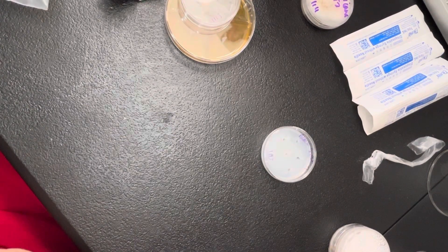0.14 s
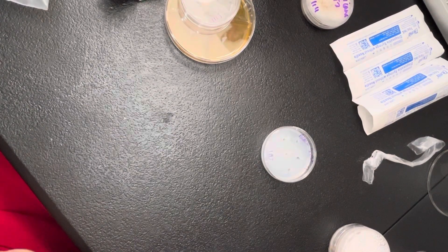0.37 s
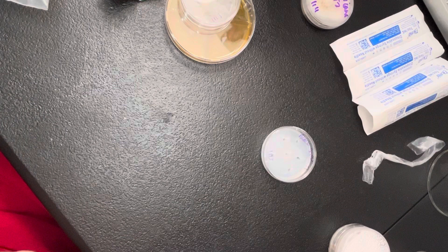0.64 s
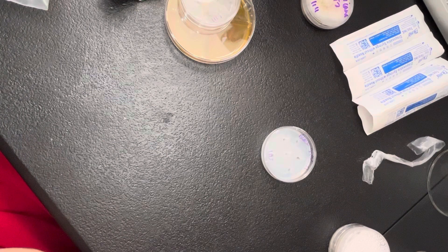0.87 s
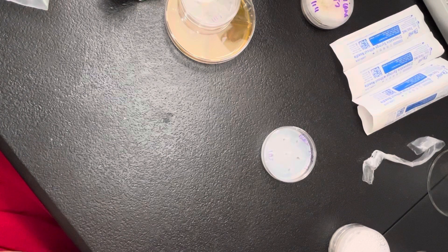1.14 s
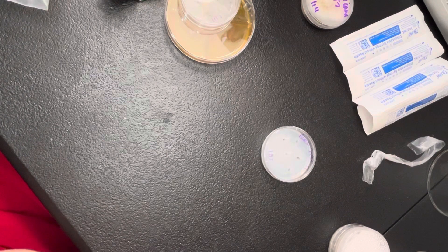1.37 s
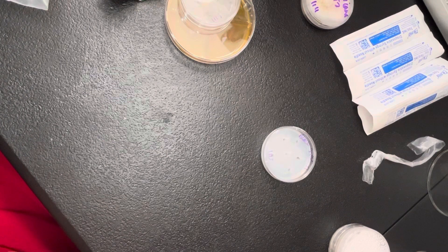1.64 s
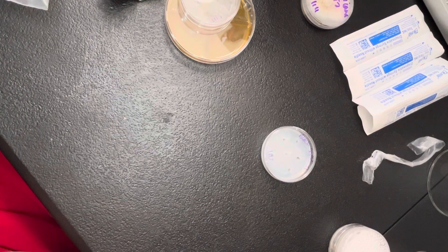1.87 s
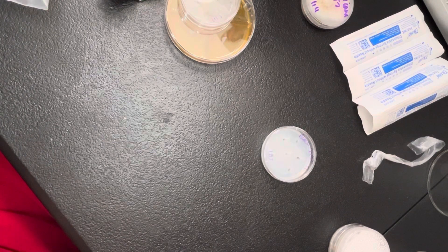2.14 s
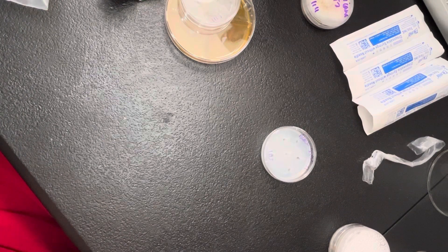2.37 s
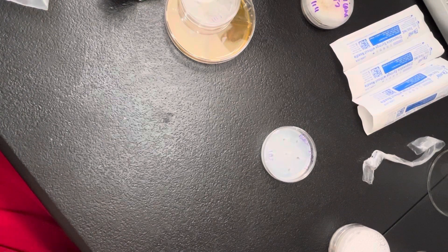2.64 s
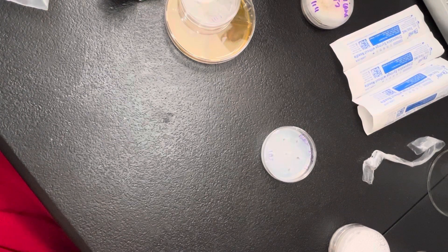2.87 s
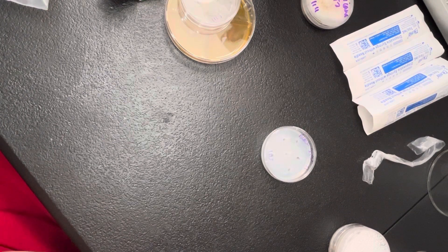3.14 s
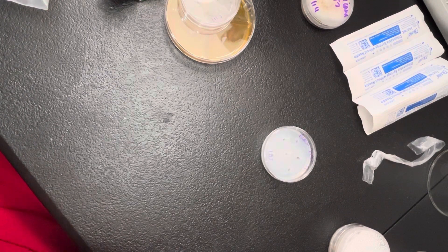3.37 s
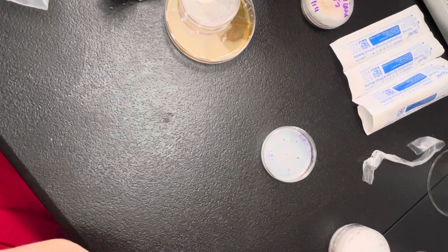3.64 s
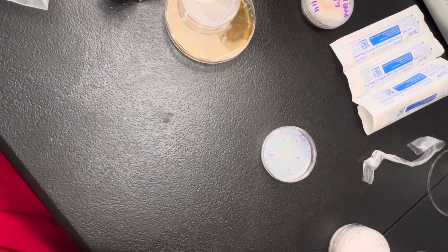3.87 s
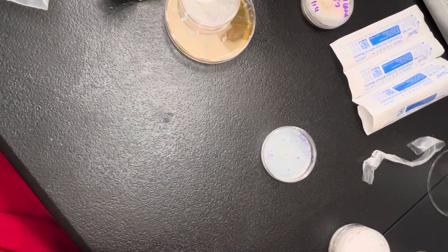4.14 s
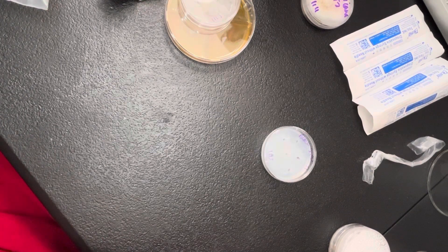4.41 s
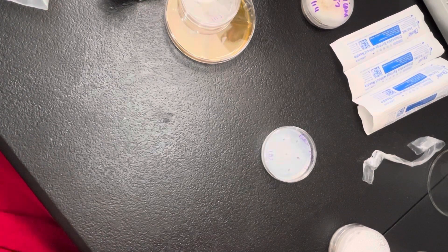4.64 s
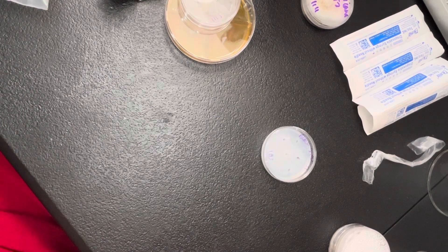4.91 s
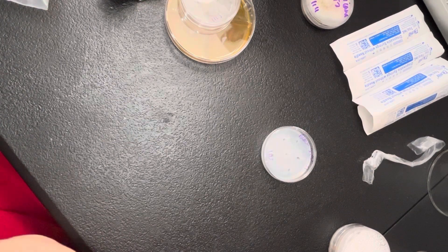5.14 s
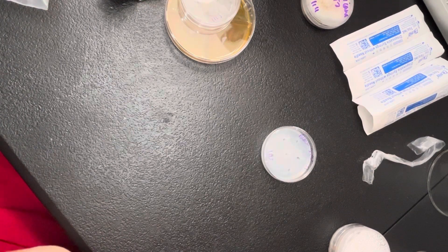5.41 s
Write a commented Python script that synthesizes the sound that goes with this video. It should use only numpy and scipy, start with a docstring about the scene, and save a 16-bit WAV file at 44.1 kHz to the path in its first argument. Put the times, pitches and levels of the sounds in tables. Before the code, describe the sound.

Thin plastic rims tick and snap, with dull fingertip knocks, dry sliding fingers and a few soft bench thumps. Sparse and quiet for the first two and a half seconds, apart from a clear click near one second, then louder bursts, busiest after four seconds. Close stereo phone pickup, short lively room reflections, distant air rumble.

```python
"""Plastic dishes on a bench

Small plastic dishes and lids are handled just above a hard bench in a quiet room. Rims click as contacts
excite the dish's modes; noise of sticking and slipping skin rubs; damped resonances knock under fingertips;
decaying low modes thump in the bench. The walls answer by echoes and a tail; filtered noise hums as far
ventilation. A phone with two microphone ports listens; the hands are nearer the right port."""
import sys
import numpy as np
from scipy import signal
from scipy.fft import rfft, irfft, next_fast_len
from scipy.io import wavfile
from scipy.ndimage import uniform_filter1d, minimum_filter1d, map_coordinates

SR = 44100
rng = np.random.default_rng(int(sys.argv[2]) if len(sys.argv) > 2 else 0)


def waveform_to_disk(signal):
    """Save audio, clipped to [-1, 1], as 16-bit WAV at the path in sys.argv[1]."""
    frames = np.transpose(np.atleast_2d(signal))
    scaled = np.clip(frames, -1, 1) * 32767
    samples = np.round(scaled).astype(np.int16)
    wavfile.write(sys.argv[1], SR, samples)


def level_to_linear(level):
    """Convert decibel levels to linear amplitude factors, elementwise."""
    exponent = np.asarray(level, float) / 20
    return 10 ** exponent


N = 243431  # length in samples

# Spectrum of the ventilation. Each row: frequency in Hz, relative density in dB per Hz.
AIR_SPECTRUM = [(18, -36.5), (30, -14.5), (45, -1.5), (58, 3.5), (68, -5.5), (100, -15), (125, -20.5),
                (170, -19), (260, -16.5), (400, -22), (800, -28.5), (2000, -36), (5600, -38.5),
                (10000, -53)]
# Likeness of the ventilation at the two ports. Each row: frequency in Hz, correlation (clipped to -1..1).
PORT_LIKENESS = [(60, 1), (130, 0.67), (290, 0.079), (640, 0.068), (1400, 0.54), (3100, -1.2), (8000, 0.2)]
# Fingers sliding on plastic. Each row: middle in seconds, length in seconds, hiss level in dB,
# rustle level in dB before its blend over the scuff resonances, rustle pitch in Hz.
SLIDES = [(0.076, 0.23, -83, -56, 2530), (0.127, 0.16, -90, -76, 750), (0.338, 0.15, -72, -62.5, 1070),
          (0.473, 0.27, -56, -68, 1068), (0.952, 0.19, -64, -63.5, 730), (1.483, 0.22, -71, -89, 1086),
          (2.08, 0.39, -65, -103, 840), (2.398, 0.16, -64, -67, 890), (2.57, 0.14, -49, -67, 2100),
          (2.78, 0.31, -45, -70, 2350), (3.243, 0.28, -56, -81, 980), (3.282, 0.077, -68, -40.5, 725),
          (3.477, 0.13, -47.5, -47.5, 1510), (3.607, 0.065, -54, -62, 1900), (3.76, 0.032, -54, -62, 1100),
          (4.038, 0.22, -50, -56, 940), (4.207, 0.19, -56, -41.5, 1980), (4.52, 0.31, -51, -53, 1960),
          (4.793, 0.24, -44, -50.5, 665), (5.013, 0.048, -56, -56, 2500), (5.142, 0.16, -36.5, -51, 1130),
          (5.38, 0.6, -53, -54.5, 1100), (5.502, 0.29, -70, -55, 880)]
# Tone of skin on plastic. Each row: frequency in Hz, gain in dB.
SKIN_TONE = [(200, -15), (500, 1.5), (1200, -2), (2500, -4), (4000, -4), (7000, -6.5), (12000, -14),
             (16000, -1.5)]
# Resonances of the cupped hands. Each entry: frequency in Hz.
SCUFF_HZ = [740, 1413, 2300]
# Arms shuffling on the bench. Each row: time in seconds, rms level in dB.
SHUFFLE = [(0.0, -63), (0.63, -62), (1.14, -63), (2.54, -61.5), (2.77, -59.5), (3.15, -62), (3.47, -54.5),
           (3.98, -60.5), (4.18, -52.5), (4.61, -63), (4.84, -55), (4.95, -61), (5.21, -48.5), (5.52, -56)]
# Rim contacts. Each row: time in seconds, level in dB before the common contact gain, side wall share in dB,
# sharp edge share in dB, rim pitch in Hz.
CONTACTS = [(0.0054, -27.5, -2.5, -4, 7550), (0.087, -43, -7, -0.5, 5100), (0.1435, -45, -15, 3, 4900),
            (0.4444, -39, -11, -8, 6500), (0.545, -60, -3, 4, 7360), (0.6005, -38, 6, -21, 3400),
            (0.697, -47.5, 13, 7.5, 4900), (0.749, -46, -9, 1, 5230), (0.852, -52.5, -1, 1, 6660),
            (0.9187, -50, 0, 0.5, 6070), (0.9353, -48, 10, 0.5, 4800), (0.9706, -16, -4.5, 6, 5120),
            (1.0853, -35.5, -5.5, 1, 5150), (1.1508, -48, -7, 1, 6550), (1.3083, -46, -18, -11, 6600),
            (1.398, -39.5, 4.5, -11.5, 5960), (1.4614, -34, -8.5, -4.5, 5570),
            (1.6497, -32.5, -0.5, 2, 6120), (1.8841, -41.5, -2.5, 2.5, 5000), (1.937, -46, -2, -3.5, 7750),
            (1.9617, -43, 4, 3, 4470), (1.9918, -33.5, -10, 1.5, 5270), (2.236, -48.5, 8, -2, 4480),
            (2.378, -48, -1, -1.5, 4760), (2.475, -46, 4, 1, 6510), (2.5238, -34, -2, -4, 6680),
            (2.5408, -26, -3.5, -6.5, 6560), (2.5853, -33.5, 3.5, 5.5, 4910), (2.6429, -38, 4.5, -6, 4320),
            (2.6725, -26.5, -11, -6, 7060), (2.7012, -25, -16, -28, 5200), (2.7091, -5.5, -5.5, -5.5, 4870),
            (2.7154, -26, -1, -5, 4930), (2.73, -11, -27, -9, 5320), (2.833, -7, -12, -3, 6870),
            (2.8432, -10.5, -15, -12, 4900), (3.0696, -43, -17, -0.5, 4560), (3.2493, -29, 1.5, -5.5, 6040),
            (3.3116, -39, -12, -15, 3565), (3.4436, -39, 7, -6, 3300), (3.459, -34, 7.5, 5, 4830),
            (3.585, -37, -10, -1, 6290), (3.6084, -34.5, 5.5, -2, 4850), (3.634, -31, 2, -3.5, 4580),
            (3.669, -17.5, -12, 1.5, 4570), (3.7699, -14.5, -6.5, -5.5, 5930),
            (3.8219, -31, -14, 4.5, 4100), (3.8952, -43, -7, 3, 4590), (3.927, -54.5, -3, 18.5, 4680),
            (4.0225, -30.5, 6.5, -1, 5070), (4.0757, -10, -5, -2, 7400), (4.0841, -20.5, -2, -2, 5400),
            (4.117, -25.5, -15, -1, 5230), (4.143, -6.5, 0, -2.5, 6100), (4.177, -6, 2.5, -2, 6860),
            (4.1848, -17, -2, -2, 5230), (4.1957, -16, -14, 5, 4970), (4.2014, -9.5, -5, -1.5, 4200),
            (4.218, -11, 4.5, -0.5, 6530), (4.2488, -18.5, -14, 3, 6100), (4.3435, -28, -15.5, -6, 6160),
            (4.4643, -11, 7, 1, 5100), (4.4938, -7.5, -2.5, -1.5, 7570), (4.5267, -8.5, 1, 2.5, 3230),
            (4.6653, -36.5, -10, -1, 5005), (4.7134, -44, 6, 0, 3300), (4.737, -35, 8, -1, 5550),
            (4.7585, -26.5, 7.5, -1.5, 5390), (4.8, -21, 1.5, 2.5, 5100), (4.8789, -29, 8.5, -10, 4440),
            (4.9355, -37, -12, 2, 5230), (4.9643, -26, -12, -10, 3750), (4.9816, -7.5, -1, -3.5, 4900),
            (5.0038, -29, -3, -4, 5670), (5.0136, -16, 3, 1, 5700), (5.0507, -12.5, 1.5, 6, 7220),
            (5.0572, -14, -24, -4, 4660), (5.0638, -6.5, -3.5, -10, 6490), (5.0717, -23, -3, -2, 4730),
            (5.0813, -10, 1.5, 3, 5910), (5.1073, -22, -3, 3.5, 4920), (5.137, -9, -6, 1, 6500),
            (5.2407, -17.5, -12, -6.5, 3970), (5.2951, -18.5, -7, -4.5, 5020), (5.3438, -38, -9, 0, 4960),
            (5.4856, -35.5, -0.5, 1.5, 5540)]
# Modes of the dish: hollow below 1.4 kHz, side wall up to 3 kHz, rim above, edge over 8 kHz.
# Each row: frequency in Hz, width in Hz, level in dB before a contact's shares.
DISH_MODES = [(300, 49, 6.5), (484, 51, 4), (654, 50, -0.5), (745, 27, 7.5), (1180, 580, -1),
              (1583, 716, 4), (1985, 704, 11), (2350, 1086, 7), (3005, 563, 3.5), (3274, 620, 1.5),
              (4760, 1184, 1), (5455, 820, 4.5), (6200, 1010, -1.5), (9040, 1770, 10.5), (10090, 4070, 9),
              (11610, 1630, 12), (14700, 3400, 1.5)]
# Fingertip taps and dull knocks. Each row: start in seconds, peak of the knock in dB, pitch in Hz.
TAPS = [(0.465, -46.5, 496), (0.476, -34, 1070), (0.597, -40.5, 1178), (0.662, -33, 1020),
        (0.696, -40, 500), (0.97, -24.5, 471.5), (1.316, -47.5, 820), (1.649, -38.5, 330),
        (1.819, -42.5, 1230), (2.709, -34.5, 510), (2.835, -30.5, 510), (3.084, -44, 1180),
        (3.189, -38.5, 1130), (3.278, -35, 430), (3.442, -36.5, 770), (3.469, -39, 307), (3.481, -39, 980),
        (3.941, -48.5, 1010), (4.018, -29.5, 880), (4.176, -28, 305), (4.219, -29.5, 302),
        (4.254, -38.5, 523), (4.463, -25.5, 1214), (4.492, -27.5, 706), (4.528, -26.5, 800),
        (4.55, -30.5, 530), (4.759, -31.5, 550), (4.799, -23, 522), (4.88, -37, 296), (5.054, -23, 732),
        (5.069, -23.5, 720), (5.089, -28, 700), (5.138, -32, 710), (5.372, -39, 615), (5.495, -36.5, 740)]
# Bench thumps. Each row: start in seconds, level in dB before a common trim.
THUMPS = [(0.974, -49.5), (1.654, -59.5), (2.715, -46.5), (2.848, -47), (4.191, -48), (5.062, -53)]
# Modes of the bench top. Each row: frequency in Hz, relative level in dB, time to fall 60 dB in seconds.
BENCH_MODES = [(73.7, 9.5, 0.63), (105, 17.5, 0.18), (142, 5, 0.39)]
# Decay of the room's tail. Each row: frequency in Hz, time to fall 60 dB in seconds.
ROOM_DECAY = [(150, 0.87), (600, 0.31), (2000, 1), (4000, 1), (4700, 1), (6300, 0.32), (7200, 0.395),
              (9000, 0.28), (15000, 0.12)]
# Near surfaces. Each row: mean delay in seconds, echo level in dB before the walls' tone.
NEAR_ECHOES = [(.008, -7), (0.01, -9.5), (.013, -11.5), (0.018, -24), (0.023, -30.5)]
# What the walls give back. Each row: frequency in Hz, gain in dB.
WALL_TONE = [(70, -7), (250, 0), (3000, 0), (4200, 1.5), (4700, 0.5), (6300, -0.5), (7000, -0.5),
             (8000, -13), (10000, -11.5), (11000, -5), (14000, -12.5), (16000, -19)]
# Response of the left port. Each row: frequency in Hz, gain in dB.
LEFT_PORT = [(100, -0.5), (700, -0.5), (2400, 3), (5000, -6), (8000, 5), (12000, 3), (15000, 0),
             (16500, -43)]
# Response of the right port. Each row: frequency in Hz, gain in dB.
RIGHT_PORT = [(100, -2), (1300, 2.5), (3500, 5.5), (5200, 7.5), (7000, 4.5), (9000, 8.5), (12000, -3),
              (15000, 5.5), (16500, -20)]


def unit(x):
    """Normalization: the signal scaled to rms 1."""
    return x / np.sqrt(np.mean(x ** 2) + 1e-20)


def along(points, hz):
    """Interpolation of (Hz, value) points on a logarithmic frequency axis."""
    f, v = np.transpose(points)
    return np.interp(np.log(hz + 1), np.log(f + 1), v)


def filtered(x, response):
    """Linear filtering: the spectrum is multiplied by a complex response of frequency."""
    m = next_fast_len(x.shape[-1] + 4096)
    return irfft(rfft(x, m) * response(np.fft.rfftfreq(m, 1 / SR)), m)[..., :x.shape[-1]]


def add(track, s, sound):
    """Superposition: mixes a sound in at s seconds."""
    part = track[round(s * SR):][:len(sound)]
    part += sound[:len(part)]


def wobble(rate):
    """Slow random modulation: a smooth curve through rate random knots a second."""
    return map_coordinates(rng.standard_normal(int(N * rate / SR) + 4), [np.arange(N) * rate / SR])


def resonances(modes, f):
    """Modal response: each (Hz, width Hz, dB) mode is a damped band-pass, alternating in sign."""
    hz, width, db = (np.asarray(c)[:, None] for c in modes)
    sign = (-1.) ** np.arange(len(hz))[:, None]
    return sign * level_to_linear(db) * 1j * f * width / (hz ** 2 - f ** 2 + 1j * f * width)


def ventilation():
    """Partial coherence: far rumble and hiss, as mid and side noise, are most alike at both ports in the bass."""
    def mid_side_gains(hz):
        angle = np.arccos(np.clip(along(PORT_LIKENESS, hz), -1, 1)) / 2
        return level_to_linear(along(AIR_SPECTRUM, hz)) * [np.cos(angle), np.sin(angle)]

    mid, side = filtered(rng.standard_normal((2, N)), mid_side_gains)
    level_db = -54.5 + 0.79 * wobble(5.5)
    return level_to_linear(level_db) * unit(np.array([mid + side, mid - side]))


def rubbing():
    """Stick-slip friction: skin on plastic hisses with tiny crackles and rustles; arms shuffle on the bench."""
    rest_hiss_db, rest_rustle_db = -72.5, -79  # hands never quite still
    t = np.arange(N) / SR
    middle, length, hiss_db, rustle_db, pitch_hz = np.transpose(SLIDES)[:, :, None]
    swell = level_to_linear(-20 * np.abs(t - middle) / (length / 2))  # 20 dB down at either end
    crackle = (rng.random(N) < 400 / SR) * level_to_linear(5.6 * rng.exponential(size=N).clip(0, 3))  # about 400 a second
    grain = rng.standard_normal((3, N)) * (1 + 6 * uniform_filter1d(crackle, size=20))
    skin = filtered(grain * level_to_linear(4.5 * wobble(45)), lambda f: level_to_linear(along(SKIN_TONE, f)))

    def low(f):
        return 1 / (1 + (f / 2600) ** 6)

    hiss = unit(filtered(skin[0], lambda f: 1 - low(f)))
    hiss_gain = level_to_linear(rest_hiss_db) + (level_to_linear(hiss_db) * swell).sum(0)
    dull_skin = filtered(skin[1], low)
    rustle = np.zeros(N)
    for hz in SCUFF_HZ:
        scuff = unit(filtered(dull_skin, lambda f: resonances(([hz], [0.9 * hz], [0]), f)[0]))
        # a slide drives most the resonances near its own pitch
        blend = level_to_linear(rustle_db) * np.exp(-(np.log(pitch_hz / hz) / 0.48) ** 2)
        rustle += (level_to_linear(rest_rustle_db) + (blend * swell).sum(0)) * scuff
    bench_modes = ([123.6, 291], [51.0, 93], [0, -3.5])
    shuffle = unit(filtered(grain[2], lambda f: resonances(bench_modes, f).sum(0) ** 2))
    shuffle_gain = level_to_linear(np.interp(t, *np.transpose(SHUFFLE)))
    return hiss_gain * hiss + rustle + shuffle_gain * shuffle


def chance_ticks():
    """Random point process: faint ticks of the rims, as further rows of contacts."""
    chance = rng.standard_normal((40, 3))
    times = np.cumsum(np.exp(0.55 * chance[:, 0]) / 2.5)  # median gap 0.4 s
    return [(s, -57 + 3 * a, -4, -1, 5400 * np.exp(0.2 * b))
            for s, (_, a, b) in zip(times, chance) if s < N / SR]


def clicks():
    """Impact excitation: a weak rise of noise around the rim pitch, one snap and a burst of slips drive the modes."""
    contact_db, rattle_db = 13.5, 8.0  # common gain of contacts; gain of the hollow's rattle
    lead = 0.012  # seconds computed ahead of the contact
    out = np.zeros(N)
    hz, width, level = np.transpose(DISH_MODES)
    t = np.arange(SR // 16) / SR - lead
    bins = np.fft.rfftfreq(4096, 1 / SR)
    for s, db, wall_db, edge_db, rim_hz in list(CONTACTS) + chance_ticks():
        # the low share below 1.4 kHz falls as the contact gets louder
        hollow_db = -17.5 - 0.2 * db
        share_db = np.select([hz < 1400, hz < 3000, hz > 8000], [hollow_db, wall_db, edge_db], 0)
        # the struck spot favours modes near one pitch
        struck_db = 8 * np.exp(-(np.log(hz / rim_hz) / 0.2) ** 2)
        mode_db = level + share_db + struck_db + rng.standard_normal(len(hz))
        modes = resonances((hz, width, mode_db), bins)

        slips = np.where(t < 0, level_to_linear(60 * t / 0.001), level_to_linear(-60 * t / 0.013))
        # the loose hollow parts buzz on for longer
        rattle = np.where(t < 0, level_to_linear(60 * t / 0.004), level_to_linear(-60 * t / 0.075))
        pushes = rfft(rng.standard_normal((2, len(t))) * [slips, rattle], 4096)
        pushes[0] += 0.99 * np.exp(-2j * np.pi * bins * (lead + 0.000582))  # the snap
        # hard contact: all pitches alike
        pushes /= np.sqrt(np.abs(uniform_filter1d(np.abs(pushes) ** 2, size=36)) + 1e-9)
        lead_noise = rfft(rng.standard_normal(len(t)) * (t < 0) * level_to_linear(-27 + 60 * t / 0.02), 4096)
        pushes[0] += lead_noise * np.exp(-(np.log((bins + 1) / rim_hz) / 0.27) ** 2)

        shell = pushes[0] * ((hz > 1400) @ modes)
        hollow = level_to_linear(rattle_db) * pushes[1] * ((hz < 1400) @ modes)
        sound = irfft(shell + hollow, 4096)
        skip = max(round((lead - s) * SR), 0)  # lead that would fall before time zero
        add(out, max(s - lead, 0), level_to_linear(db + contact_db) * sound[skip:len(t)])
    return out


def taps():
    """Soft impact: a fingertip's slow push gives a dull, quickly damped knock."""
    out, t = np.zeros(N), np.arange(SR // 20) / SR
    u = 1000 * t / 1.4  # time over the push's rise of 1.4 ms
    for s, db, hz in TAPS:
        def knock_response(f):
            pair = resonances(([hz, 1.77 * hz], [1.4 * hz, 1.6 * hz], [0, -4]), f).sum(0)
            return pair / (1 + (f / (2 * hz)) ** 4)

        push = (np.cos(2 * np.pi * hz * t) + 4 * rng.standard_normal(len(t))) * u * np.exp(-u)
        knock = filtered(push, knock_response)
        add(out, s, level_to_linear(db) * knock / np.abs(knock).max())
    return out


def thumps():
    """Free modal decay: the bench top booms in decaying sines with a softened onset."""
    out, t = np.zeros(N), np.arange(SR // 3) / SR
    for s, db in THUMPS:
        boom = sum(level_to_linear(level - 60 * t / t60) * np.sin(2 * np.pi * hz * t) for hz, level, t60 in BENCH_MODES)
        add(out, s, level_to_linear(db - 4) * boom * (1 - np.exp(-t / 0.002)))
    return out


def room(x):
    """Reverberation: near echoes and a tail decaying by frequency, drawn anew as the hands move about."""
    out, step = np.zeros((2, N + SR)), SR // 12  # a new response 12 times a second
    for start in range(0, N, step):
        hz, t, z = signal.stft(rng.standard_normal((2, SR // 2)), SR, nperseg=256)
        fade = level_to_linear(-60 * t / along(ROOM_DECAY, hz)[:, None])
        fade = fade + level_to_linear(22.5 - 60 * t / 0.31)  # shelves close by scatter early sound
        tail = signal.istft(z * fade, SR, nperseg=256)[1]
        tail = level_to_linear(-6.0) * tail / np.linalg.norm(tail[0])
        tail = np.pad(tail, ((0, 0), (round(0.007 * SR), 0)))  # the tail waits 7 ms
        for s, db in NEAR_ECHOES:
            tail[[0, 1], round(s * SR) + rng.integers(-70, 70, size=2)] += level_to_linear(db)
        wet = signal.fftconvolve(x[None, start:start + step], tail, axes=1)
        out[:, start:start + wet.shape[1]] += wet
    return out[:, :N]


def scene():
    """Interaural delay and reflection: sound reaches the left port later; dull knocks, close by, stir the room less."""
    air = ventilation()
    bright, dull = rubbing() + clicks(), taps() + thumps()
    lag = 12.5 / SR  # seconds
    direct = filtered(bright + dull, lambda hz: np.array([np.exp(-2j * np.pi * hz * lag), 1 + 0 * hz]))
    walls = filtered(room(bright + level_to_linear(-3.0) * dull), lambda hz: level_to_linear(along(WALL_TONE, hz)))
    return filtered(direct + walls, lambda hz: level_to_linear([along(LEFT_PORT, hz), along(RIGHT_PORT, hz)])) + air


def port_hiss():
    """Independent noise: each port hisses, mostly from 9 to 14.5 kHz."""
    noise = rng.standard_normal((2, N))
    return level_to_linear(-74.5) * filtered(noise, lambda hz: 1 / (1 + (hz / 14500) ** 16) / (1 + (9000 / (hz + 1)) ** 6))


def gate_shared_treble(x):
    """Transient gating: treble common to both ports passes, weakened, only for a moment when it jumps."""
    mid, side = (x[0] + x[1]) / 2, (x[0] - x[1]) / 2
    top = filtered(mid, lambda hz: 1 / (1 + (10500 / (hz + 1)) ** 60))
    fast, slow = (np.abs(uniform_filter1d(top ** 2, size=n)) for n in (128, 2048))
    shut = minimum_filter1d(1. * (fast < 5 * slow), size=440, origin=120)
    mid = mid - top + level_to_linear(-14.0) * top * (1 - uniform_filter1d(shut, size=128))
    return np.array([mid + side, mid - side])


def low_pass(x):
    """Removes everything above the highest recorded frequency."""
    return signal.sosfilt(signal.butter(12, 17010, fs=SR, output="sos"), x)


def record(dry):
    """Saturation and band limit: port hiss joins, shared treble is gated, peaks round off, 16.9 kHz ends the band."""
    x = gate_shared_treble(dry + port_hiss())
    x = x / (1 + np.abs(x) ** 6) ** (1 / 6)
    x = filtered(x, lambda hz: hz < 16900)
    return low_pass(x)


dry = scene()
out = record(dry)
waveform_to_disk(out)
```